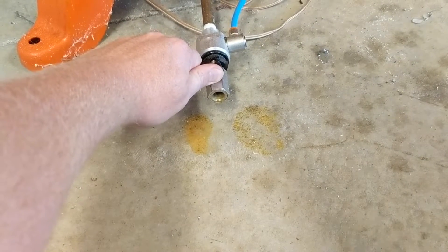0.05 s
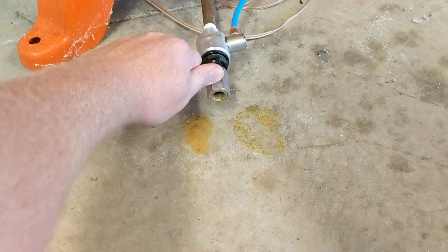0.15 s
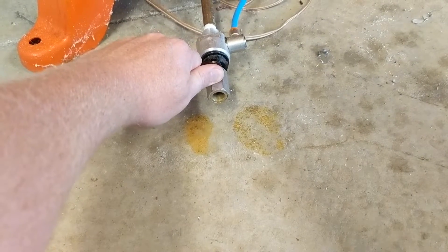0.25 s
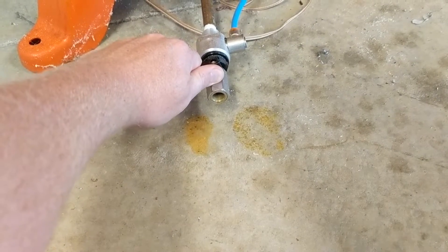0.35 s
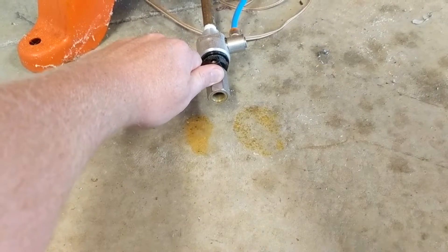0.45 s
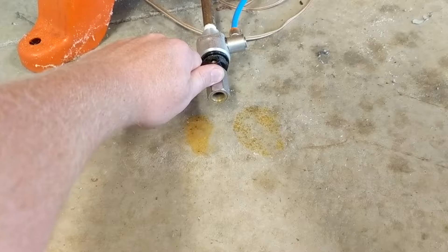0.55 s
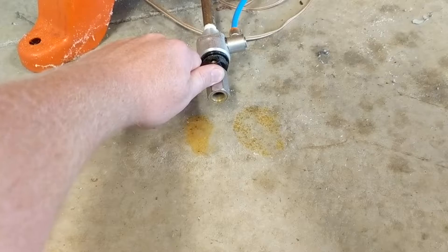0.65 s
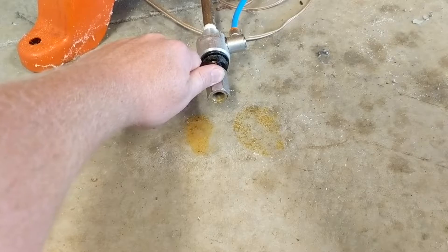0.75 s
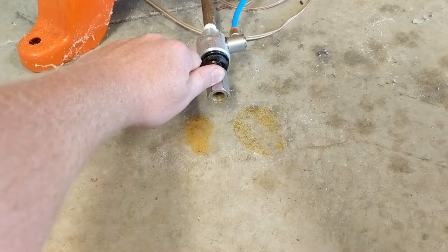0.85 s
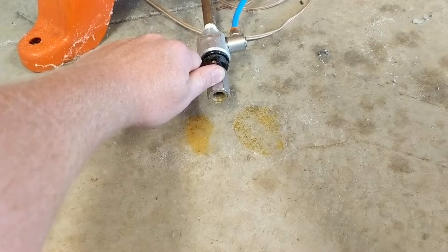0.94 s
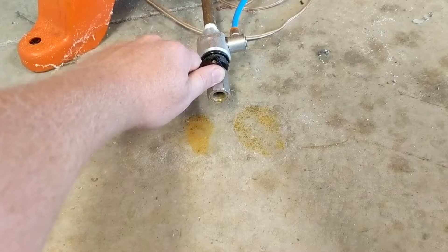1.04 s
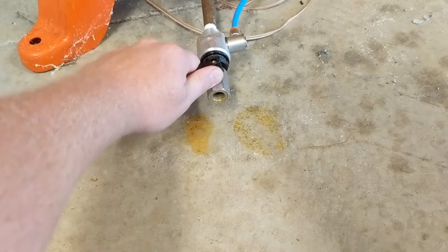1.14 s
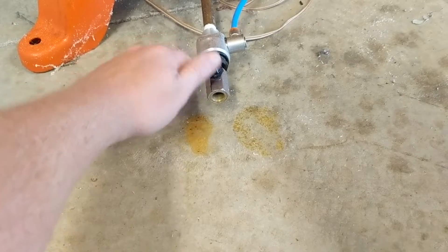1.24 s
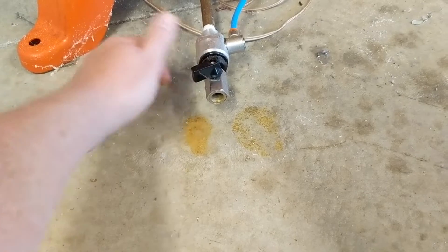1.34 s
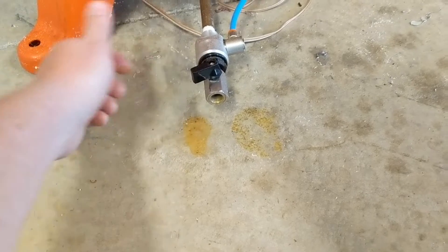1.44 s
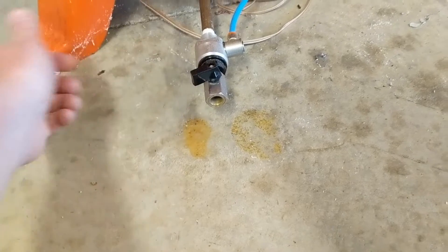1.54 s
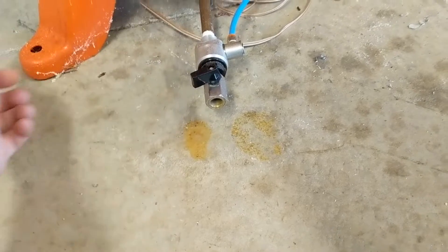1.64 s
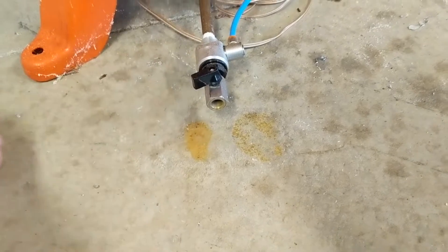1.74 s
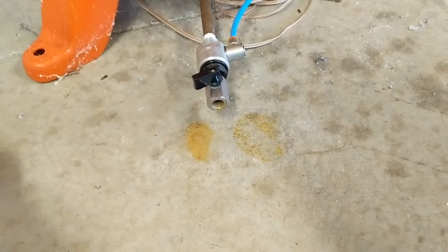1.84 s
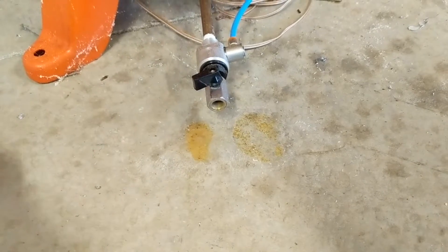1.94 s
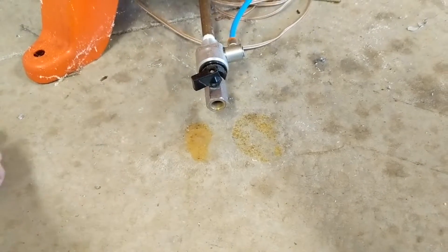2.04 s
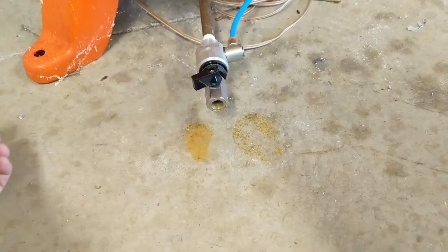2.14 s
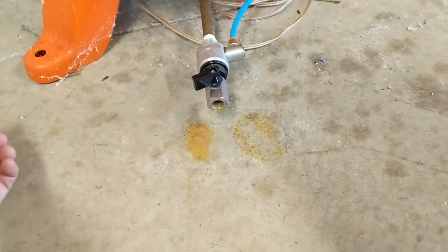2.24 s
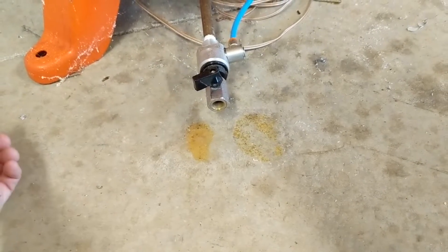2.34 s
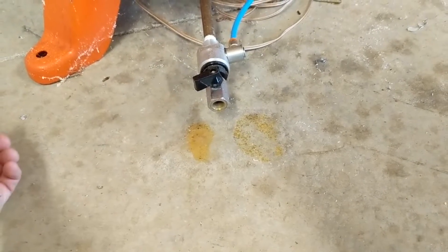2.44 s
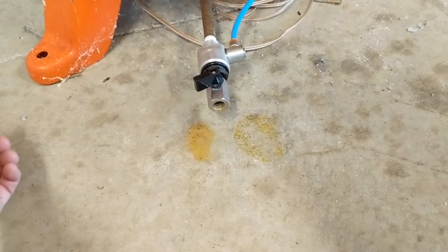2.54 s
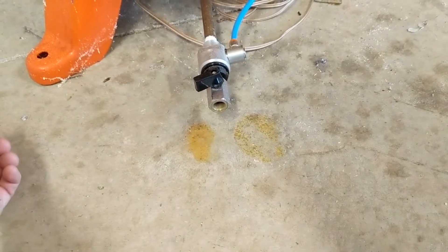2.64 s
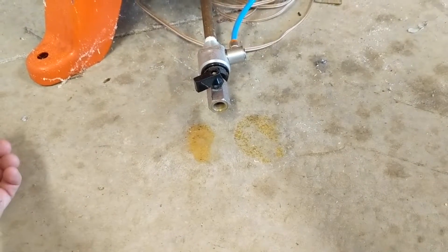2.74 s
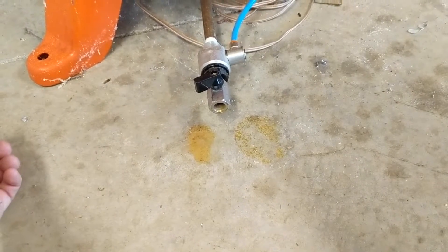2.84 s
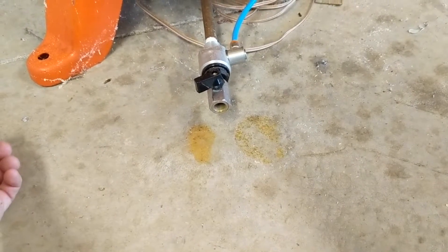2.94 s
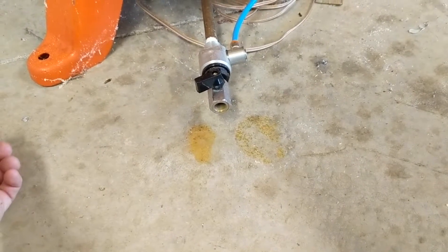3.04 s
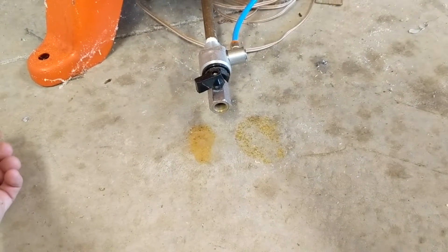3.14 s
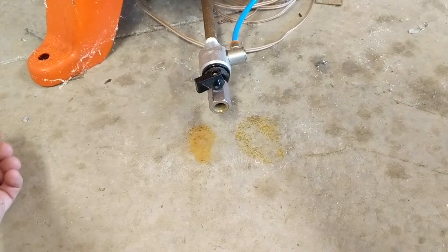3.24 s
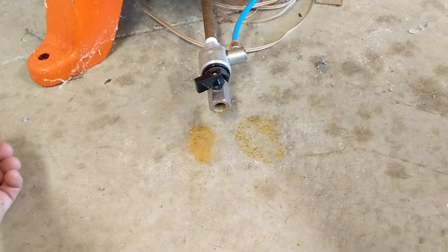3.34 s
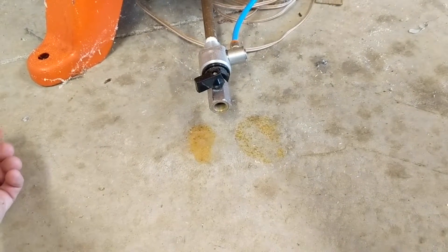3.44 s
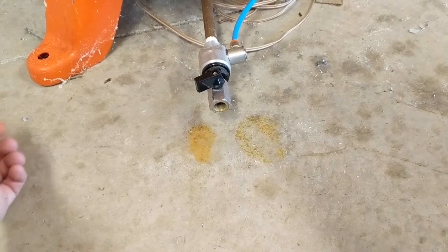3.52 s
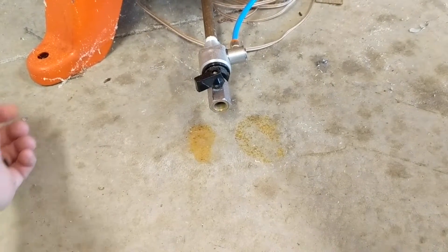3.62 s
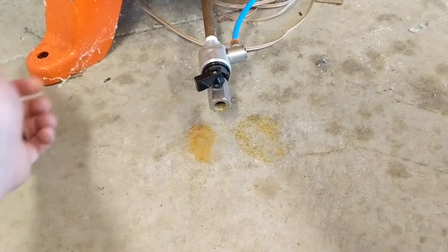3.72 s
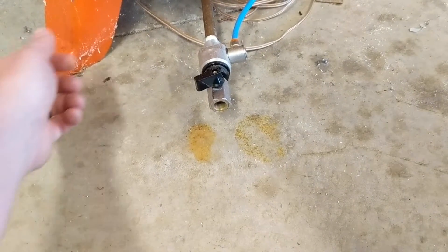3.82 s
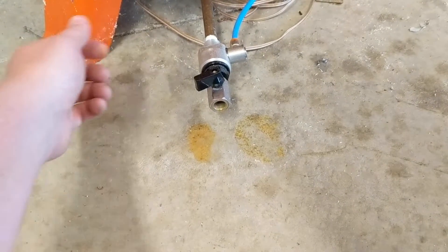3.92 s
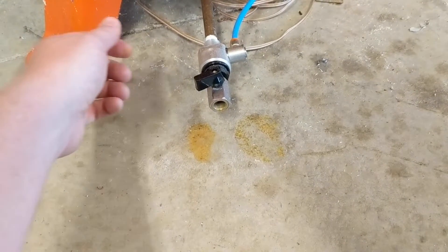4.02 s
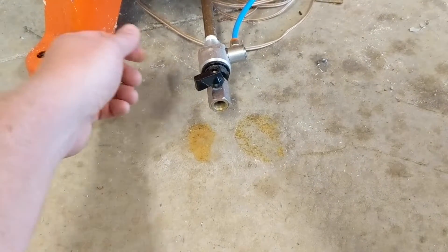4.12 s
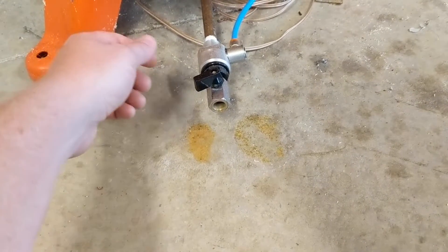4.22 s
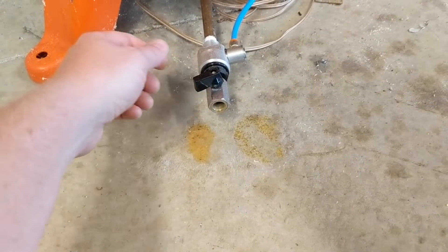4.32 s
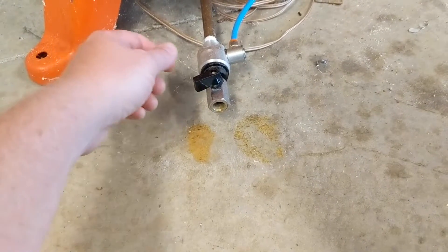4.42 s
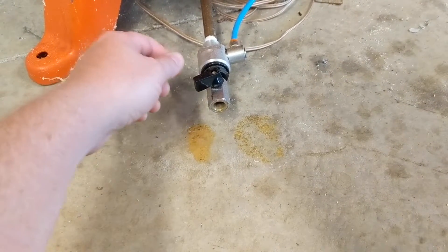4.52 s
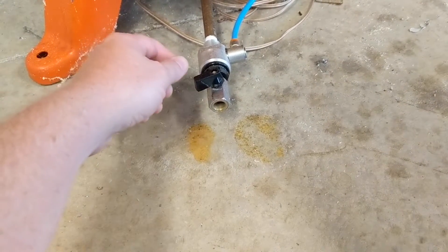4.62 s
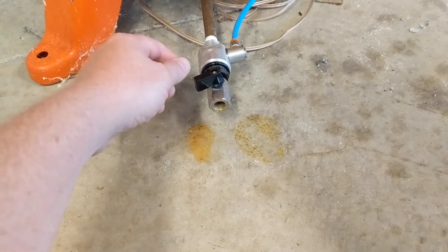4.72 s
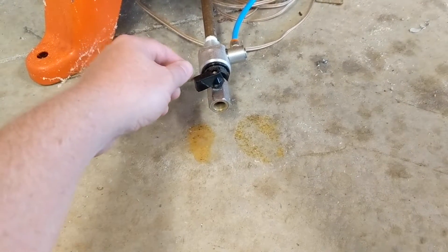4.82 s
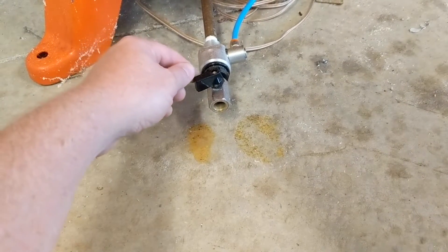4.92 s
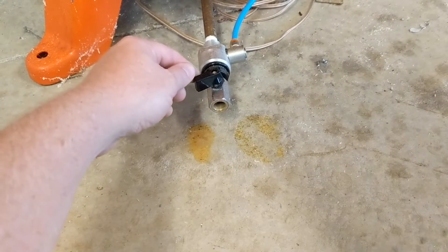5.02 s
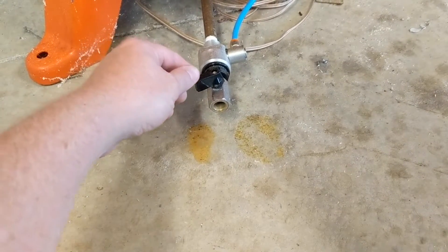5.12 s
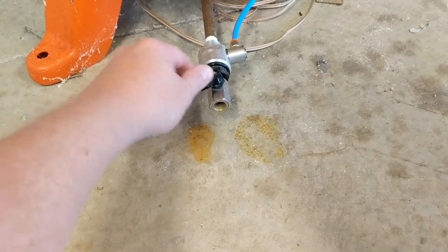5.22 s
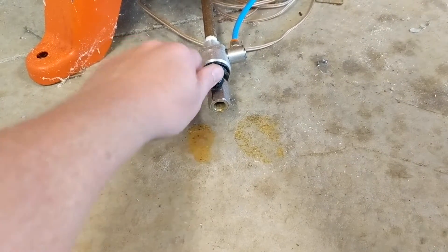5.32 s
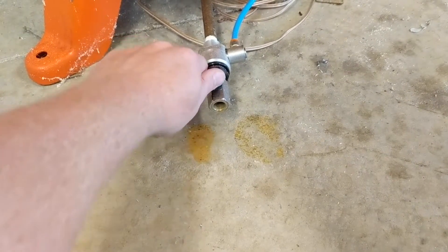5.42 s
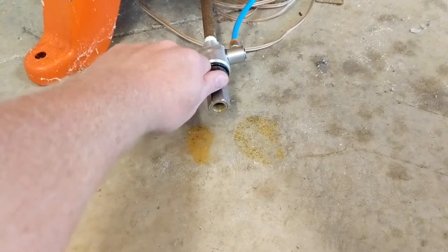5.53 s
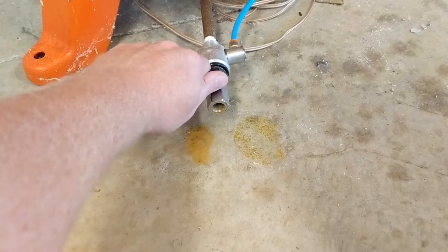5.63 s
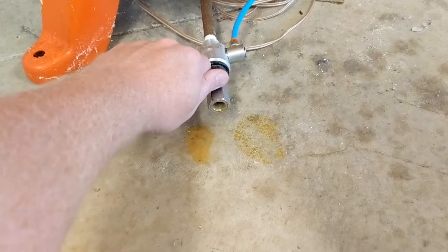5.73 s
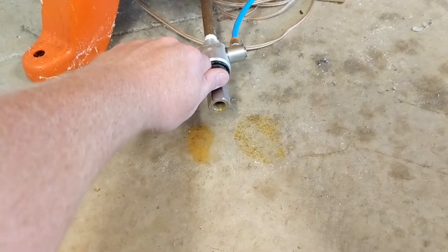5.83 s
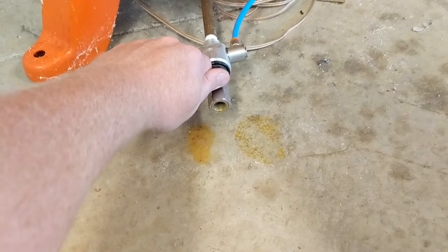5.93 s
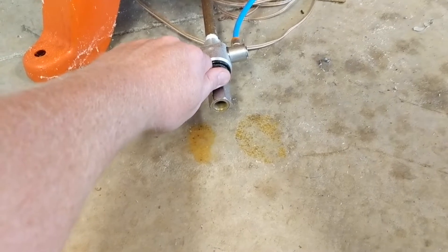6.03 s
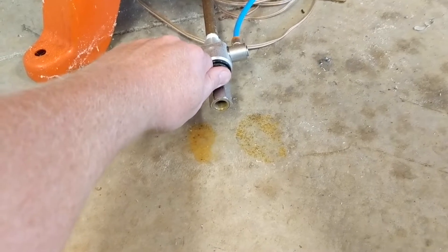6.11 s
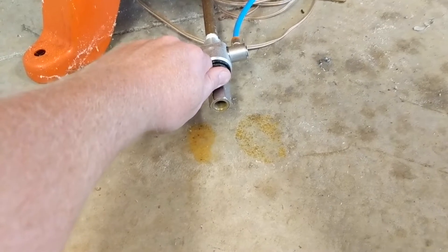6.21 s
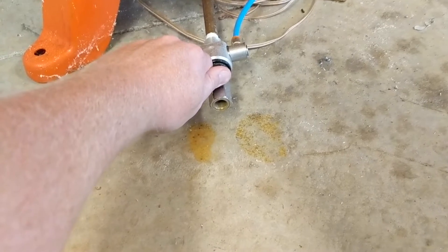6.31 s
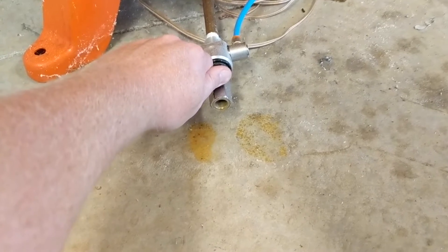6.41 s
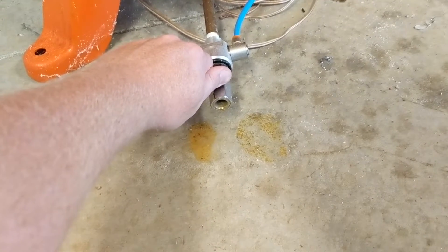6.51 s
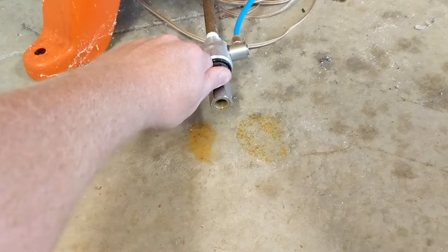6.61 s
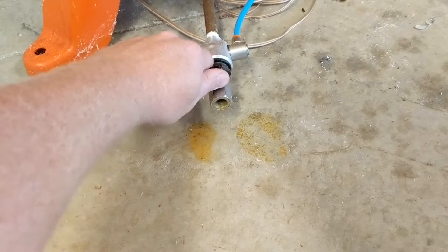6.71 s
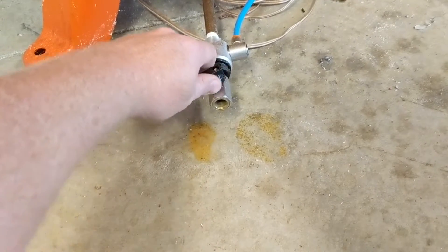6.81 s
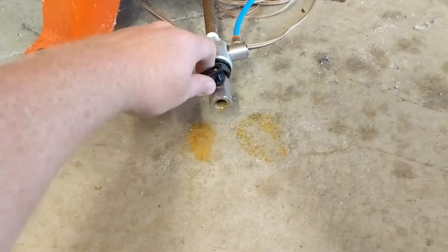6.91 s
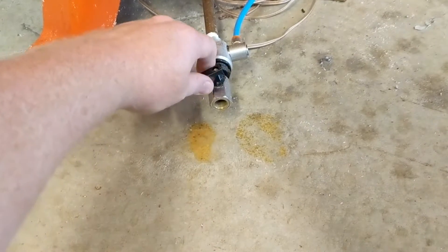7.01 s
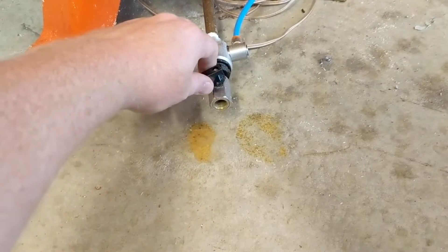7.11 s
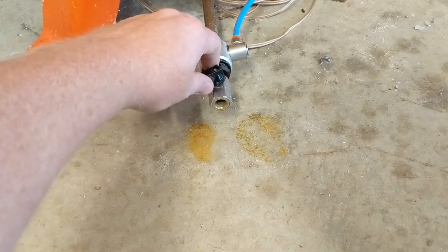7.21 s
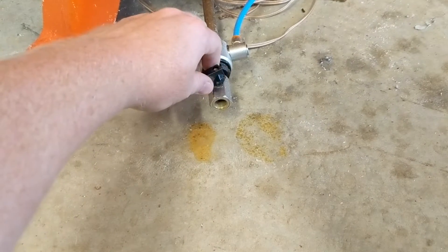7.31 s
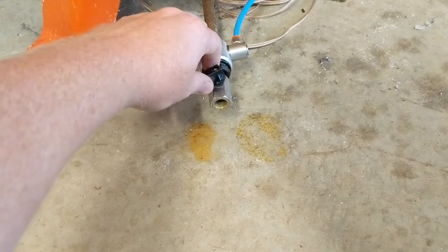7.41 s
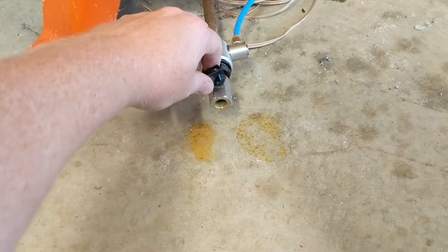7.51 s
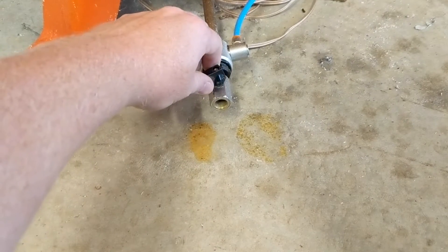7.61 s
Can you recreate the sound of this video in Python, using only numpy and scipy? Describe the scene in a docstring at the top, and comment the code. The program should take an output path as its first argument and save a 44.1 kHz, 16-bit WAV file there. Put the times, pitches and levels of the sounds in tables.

```python
"""A faint mains hum and a quiet room come first; then a hand opens a drain valve just above a concrete floor.
Compressed air hisses out: noise that echoes of floor, fittings and hand comb within milliseconds.
The hand draws back at 1.3 s and returns at 3.7 s, so an echo slides and the comb glides through the hiss.
At 6.1 s it opens the tap further: the hiss grows, and stray air, there as a low roar since the opening, swells.
Pressure steps pop on the microphone at the opening and, thickest, in the last second and a half."""
import sys
import numpy as np
from scipy import signal
from scipy.fft import rfft, irfft, next_fast_len
from scipy.io import wavfile
from scipy.ndimage import uniform_filter1d, map_coordinates

SR = 44100
rng = np.random.default_rng(int(sys.argv[2]) if len(sys.argv) > 2 else 0)


def nominal_scale(level):
    """Amplitude ratio for a level in decibels (scalar or array-like)."""
    x = np.asarray(level, float) / 20
    return 10 ** x


def to_wav(sig):
    """Store sig (one row per channel, or 1-D mono) as 16-bit WAV at the path in sys.argv[1].

    Samples outside -1..1 are clipped; the rate is SR.
    """
    pcm = np.clip(np.atleast_2d(sig), -1, 1) * 32767
    pcm = np.round(pcm).astype(np.int16)
    wavfile.write(sys.argv[1], SR, pcm.T)  # frames by channels


N = 337760  # length in samples
T = np.arange(N) / SR  # time of each sample, s
SIZE = next_fast_len(N + SR // 2)  # spectrum length, with spare room for echoes
HZ = np.arange(SIZE // 2 + 1) * SR / SIZE  # frequency of each spectrum line


def jet():
    """Turbulent noise, surging with its eddies, combed by the echoes of each hand position in turn."""
    # the hiss over time: start_s, body_db (under 4.8 kHz), then levels above the body:
    # edge_db (to about 6 kHz), sizzle_db (to about 10 kHz), top_db (beyond)
    jet_levels = [(0.0, -86, -3, -1, -8), (0.06, -59.5, -4, -3, -17), (0.14, -55, -2, 1.5, -4),
                  (0.32, -30, -7.5, -13, -24), (0.4, -29, -4, -10, -24), (0.59, -28, -4, -10.5, -26),
                  (0.63, -31.5, -4.5, -8, -21), (0.87, -30, -4, -10.5, -23), (0.93, -32, -4, -9.5, -21),
                  (1.4, -29.5, -5, -10, -20), (1.53, -34, -4, -5.5, -13), (1.62, -33, 0.5, -4, -16),
                  (1.81, -29.5, -3.5, -10.5, -19.5), (2.7, -33, -2, -9, -18), (3.62, -32, -2.5, -9.5, -18),
                  (3.73, -30, 1.5, -4.5, -15), (3.84, -32.5, -4, -6.5, -17), (3.92, -33, 3.5, -2, -15),
                  (3.97, -34, -1, -3, -18), (4.09, -34.5, -3, -5, -16), (4.14, -29.5, -11.5, -6.5, -15.5),
                  (4.41, -29, -4.5, -11, -17.5), (5.2, -30, -1, -10, -18), (5.5, -31, -0.5, -3.5, -17.5),
                  (5.97, -30, -1, -4.5, -20), (6.02, -35, -2, -3.5, -17), (6.11, -30.5, -1.5, -6, -20),
                  (6.14, -26, 1, -2, -16), (6.4, -27, 0.5, 2, -12.5), (6.74, -28.5, 3.5, 4, -11),
                  (7.0, -28, 3.5, 0, -11.5), (7.66, -27, 1, 0.5, -12.5)]
    # where the bands split: edge_hz, fade_hz
    jet_bands = [(4800, 200), (6150, 400), (9700, 400)]
    # where hand and phone come to rest: start_s, hollow_hz, hollow_depth (0-1), echoes (delay_ms, share)
    hand_places = [(0, 4820, 0.87, [(2.2, .1), (0.21, .19), (0.34, -.14), (.587, -.18), (1.3, -.16)]),
                   (.3, 4770, 0.99, [(1.6, .06), (0.19, -0.22), (0.34, -0.1), (0.52, 0.00017),
                   (1.9, -.06)]), (1.3, 4760, 0.55, [(1.248, -.07), (0.28, 0.075), (0.42, -0.073)]),
                   (1.78, 4860, 0.65, [(0.39, -0.051), (.166, -.17), (0.2, -0.035), (0.3, -0.18),
                   (.833, 0.052)]), (2.2, 4870, 0.65, [(.52, 0.036), (1.06, -0.04), (1.732, 0.094),
                   (.167, -.13), (.261, -.25), (.34, -0.18), (.411, -0.16), (1.203, -0.0047),
                   (1.467, -0.12)]), (3.67, 4770, 0.72, [(.668, -.08), (0.17, 0.12), (0.47, .08),
                   (1.574, 0.071)]), (4.12, 4900, .6, [(.6, -0.082), (.89, .11), (.129, -.35),
                   (.175, -0.09), (.275, .12), (.469, 0.18)]), (4.35, 4830, 0.71, [(1.6, -0.085),
                   (.344, 0.089), (.127, -0.27), (0.19, 0.049), (0.31, -0.16), (0.62, -0.19), (1.2, 0.14)]),
                   (5.35, 4730, .5, [(.122, -0.16), (.201, 0.11), (.372, .11), (.645, -0.15)]),
                   (5.98, 4650, .65, [(.288, 0.13), (.492, -0.14), (1.186, 0.16)]),
                   (6.13, 4680, 0.52, [(.3, .09), (0.38, 0.047), (0.1, .21), (.202, -0.12), (0.44, -0.09)]),
                   (6.45, 4700, 0.51, [(.908, -.06), (1.196, 0.07), (.222, -0.17), (.306, .18), (.368, .26),
                   (.624, -.15)]), (6.85, 4900, .3, [(.379, 0.045), (.168, 0.044), (0.22, -0.091),
                   (.338, 0.2), (0.84, -0.05), (1.35, -0.13), (0.4, -0.072)]),
                   (7.2, 4450, .25, [(.233, -0.12), (.342, 0.16), (.497, -.1), (.857, -0.044),
                   (1.482, .07)])]
    eddy_db, flutter_db = 0.63, 0.32  # fast and slower surges
    flicker_db, flicker_per_s = 0.65, 24  # each band's own unsteadiness
    move_s = 0.04  # time to change from one place to the next

    surge_db = eddy_db * walk(150) + flutter_db * walk(30)
    eddies = rfft(rng.standard_normal(N) * nominal_scale(surge_db), SIZE)
    fixed_path = nozzle() * fittings() * walls()
    arrived = [np.clip((T - place[0]) / move_s + 0.5, 0, 1) for place in hand_places[1:]]
    # how much each place counts at each moment; the weights add up to 1
    held = -np.diff([np.ones(N)] + arrived + [np.zeros(N)], axis=0)
    parts = shares(jet_bands)
    bands = np.zeros((len(parts), N))
    for weight, (_, hollow_hz, depth, taps) in zip(held, hand_places):
        path = fixed_path * cavity(hollow_hz, depth) * echoes(taps)
        bands += weight * np.array([play(eddies, path * part) for part in parts])
    bands *= [nominal_scale(flicker_db * walk(flicker_per_s)) for _ in parts]

    body_db, *upper_db = columns(jet_levels)
    upper = np.sum(nominal_scale(np.array(upper_db)) * bands[1:], axis=0)
    return sweeps(nominal_scale(body_db) * (bands[0] + upper))


def nozzle():
    """Nozzle and microphone port colour the noise: a weak lower flank, narrow gaps and a sharp upper end."""
    # the weak lower flank: pitch_hz, gain_db (only the shape counts)
    flank = [(500, -50), (1200, -37.5), (1800, -16.5), (2300, -27.5)]
    # nozzle and microphone port above it: pitch_hz, gain_db (only the shape counts)
    port = [(2800, -23.5), (3300, -8), (3900, -3), (4500, -0.5), (5300, 3), (6200, -12), (8000, -11.5),
            (9200, -11), (9900, -23.5), (11000, -25), (12400, -28), (15000, -26.5), (15700, -25)]
    # narrow gaps in the treble: pitch_hz, half_width_hz, depth (0-1)
    gaps = [(12400, 120, .5), (13780, 90, .6)]
    top_hz = 15760  # nothing above this
    gain = colour(list(flank) + list(port)) * (HZ < top_hz)
    return gain * np.prod([dip(*gap) for gap in gaps], axis=0)


def fittings():
    """Hard surfaces close by send back copies of the hiss within about 3 ms."""
    # echoes off floor, valve body and pipes: delay_ms, share (of the direct sound; minus flips it)
    near_echoes = [(0.514, -0.1), (0.567, -0.18), (0.624, -0.1), (0.773, 0.04), (0.839, 0.13),
                   (0.891, 0.06), (1.034, 0.04), (1.156, 0.05), (1.307, -0.03), (1.497, 0.03),
                   (1.919, 0.04), (3.041, -0.03)]
    return echoes(near_echoes)


def walls():
    """Direct sound plus the garage's scattered, fading answer."""
    answer_db, fade_60db_s = -15, 0.07  # whole answer against the direct sound; time to fall by 60 dB
    t = np.arange(SR // 2) / SR
    fade = np.exp(-np.log(1000) * t / fade_60db_s)
    tail = rng.standard_normal(len(t)) * fade * (t > 0.004)  # the first 4 ms stay empty
    return 1 + nominal_scale(answer_db) * rfft(tail / np.sqrt(np.sum(tail ** 2)), SIZE)


def cavity(hollow_hz, depth):
    """A side cavity of the valve swallows one narrow band and rings just under it."""
    hollow = dip(hollow_hz, 130, depth)
    ring = dip(hollow_hz - 300, 91, -0.48 * depth)  # 300 Hz lower, lifted
    return hollow * ring


def sweeps(hiss):
    """The moving hand adds an echo whose delay slides, so the comb glides."""
    # sweeps past the valve: start_s, length_s, first_delay_ms, last_delay_ms, share (at mid-sweep)
    hand_sweeps = [(1.302, 0.54, 0.36, 1.67, 0.25), (3.65, 0.51, 1.57, 0.28, 0.26)]
    out = hiss
    for start_s, length_s, first_ms, last_ms, share in hand_sweeps:
        late_s = np.interp(T, [start_s, start_s + length_s], [first_ms, last_ms]) / 1000
        echo = map_coordinates(hiss, [(T - late_s) * SR], mode="mirror")
        out = out + share * bump(start_s, length_s) * echo
    return out


def draught():
    """Spent air sweeps over the microphone port as noise, in gusts and small lumps."""
    # stray air over time: start_s, low_roar_db, then levels above the low roar:
    # upper_roar_db (over about 1 kHz), buffeting_db (under about 135 Hz)
    air_levels = [(0.0, -81, -8, 2), (0.12, -81.5, -2, 6), (0.32, -68, 13, -8), (0.45, -60, -3, -14),
                  (0.7, -56, 4, -16), (1.05, -59.5, 4.5, -13), (1.5, -55, 8.5, -10), (1.9, -56, 4.5, -13),
                  (3.6, -55.5, 3, -17), (4.0, -55.5, 3.5, -8), (4.4, -55.5, 4.5, -14.5),
                  (5.67, -57.5, 2.5, -19), (6.1, -55.5, 3.5, -8), (6.14, -44.5, -1, -13),
                  (6.25, -36.5, 2, -13), (6.4, -37, 2, -7.5), (6.62, -37, 1, -6), (6.75, -41, 2, -12),
                  (7.0, -44.5, 2.5, -12), (7.66, -45.5, 1.5, -7)]
    # colour of the roar: pitch_hz, gain_db (only the shape counts)
    roar_colour = [(18, -41), (30, -1), (80, 3), (171, -3), (436, -3.5), (490, -2.5), (1890, -0.5),
                   (2740, -0.5), (3200, -6.5), (4160, -59), (7040, -120)]
    # single gusts (+) and lulls (-), on the roar only: middle_s, length_s, level_db (at the middle)
    single_gusts = [(0.397, .04, 6), (1.563, 0.041, 3), (1.6, .04, 0), (3.708, 0.068, -13), (4.09, 0.06, 5),
                    (4.135, 0.069, 7.5), (4.187, 0.055, 7.5), (6.423, .04, -4), (6.594, 0.058, -4),
                    (6.672, 0.06, 3.5), (6.971, 0.099, 5.5), (7.04, 0.025, 4.5), (7.28, 0.084, 6.5),
                    (7.476, 0.029, 6.5), (7.532, 0.13, 6.5)]
    gust_db, lump_db, sway_db = 0.4, 1.0, 2.0  # slow gusts, small lumps, sway of the buffeting

    air = rfft(rng.standard_normal(N) * nominal_scale(gust_db * walk(25) + lump_db * walk(220)), SIZE)
    gain = colour(roar_colour)
    buffet, low, upper = (play(air, gain * part) for part in shares([(135, 113), (1050, 540)]))
    low_db, upper_db, buffet_db = columns(air_levels)
    gusts_db = sum(db * bump(middle_s - length_s / 2, length_s) for middle_s, length_s, db in single_gusts)
    roar = nominal_scale(gusts_db) * (low + nominal_scale(upper_db) * upper)
    buffeting = nominal_scale(buffet_db + sway_db * walk(4.4)) * buffet
    return nominal_scale(low_db) * (roar + buffeting)


def pops():
    """Each puff is a sudden pressure step on the microphone that leaks away."""
    # puffs: start_s, level_db (of the step, ahead of the low cut), direction (+1 push, -1 pull)
    puffs = [(.3546, -28.5, -1), (0.4042, -36, 1), (0.538, -48, 1), (.7366, -59, -1), (2.8404, -49, 1),
             (3.4005, -48, 1), (3.9117, -38, 1), (3.95, -34, -1), (6.1432, -25, 1), (6.6729, -24, -1),
             (6.8605, -28, 1), (6.9872, -27, 1), (7.0405, -32, 1), (7.2548, -26, -1), (7.282, -28, 1),
             (7.474, -30, 1), (7.525, -27, 1)]
    rise_ms, leak_ms = 0.16, 30
    t_ms = np.arange(SR // 4) / SR * 1000
    step = (1 - np.exp(-t_ms / rise_ms)) ** 2 * np.exp(-t_ms / leak_ms)
    out = np.zeros(N + SR)  # spare room for the last puff
    for start_s, db, direction in puffs:
        first = int(start_s * SR)
        out[first:first + len(step)] += np.sign(direction) * nominal_scale(db) * step
    return out[:N]


def mains_hum():
    """Steady low tones that waver a little in level and sink once the hiss is up."""
    # tones: pitch_hz, level_db (rms, ahead of the wavering and sinking)
    tones = [(59.2, -69), (118.4, -76)]
    # how far the hum sinks: start_s, change_db
    sinking = [(0, 0), (.35, -2), (.6, -7), (7.66, -6)]
    hum = np.zeros(N)
    for hz, db in tones:
        tone = np.sin(2 * np.pi * (hz * T + rng.random()))
        hum += np.sqrt(2) * nominal_scale(db + 1.6 * walk(12)) * tone
    return hum * nominal_scale(columns(sinking)[0])


def quiet_room():
    """The quiet of the room: faint steady noise, strongest in the bass."""
    # colour of the quiet: pitch_hz, gain_db (only the shape counts)
    quiet_colour = [(24, -30), (40, 0), (98, -8), (156, -15), (2390, -39), (4450, -25), (4790, -21),
                    (15000, -41)]
    return nominal_scale(-81) * play(rfft(rng.standard_normal(N), SIZE), colour(quiet_colour))


def colour(points):
    """Gain at every frequency, drawn through (Hz, dB) points."""
    hz, db = np.transpose(points)
    return nominal_scale(np.interp(np.log(HZ + 1), np.log(hz), db))


def shares(edges):
    """Overlapping bands that add up to the whole, split at (Hz, fade Hz) edges."""
    above = [np.clip((HZ - hz) / fade_hz + 0.5, 0, 1) for hz, fade_hz in edges]
    return -np.diff([np.ones(len(HZ))] + above + [np.zeros(len(HZ))], axis=0)


def play(spectrum, gain):
    """Sends a noise spectrum through a gain curve and evens out the power the curve adds or takes."""
    return irfft(spectrum * gain, SIZE)[:N] / np.sqrt(np.mean(np.abs(gain) ** 2))


def echoes(taps):
    """Direct sound plus delayed copies, which strengthen some pitches and cancel others: a comb."""
    return 1 + sum(share * np.exp(-2j * np.pi * HZ * ms / 1000) for ms, share in taps)


def dip(hz, half_width_hz, depth):
    """A resonance that swallows (depth > 0) or lifts (depth < 0) a narrow band."""
    return 1 - np.minimum(depth, 1) / (1 + 1j * (HZ - hz) / half_width_hz)


def walk(per_s):
    """Random levels, per_s of them each second, smoothed twice; spread 1."""
    hold = max(int(SR / per_s), 2)
    levels = np.repeat(rng.standard_normal(N // hold + 1), hold)
    smooth = uniform_filter1d(uniform_filter1d(levels, hold), hold)[:N]
    return smooth / smooth.std()


def columns(table):
    """Draws each column of a table as a curve over time; the first column is the time in s."""
    s, *values = np.transpose(table)
    return [np.interp(T, s, v) for v in values]


def bump(start_s, length_s):
    """A smooth rise from 0 to 1 and back."""
    return np.sin(np.pi * np.clip((T - start_s) / length_s, 0, 1)) ** 2


def scene():
    """One microphone feeds both channels."""
    mix = jet() + draught() + pops() + mains_hum() + quiet_room()
    return np.tile(mix, (2, 1))


def low_pass(x):
    """Removes everything above the highest recorded frequency."""
    return signal.sosfilt(signal.butter(12, 16990, fs=SR, output="sos"), x)


def record(dry):
    """A steep low cut turns the pressure steps into thuds; then peaks are gently rounded."""
    low_cut_hz, ceiling = 56, 0.71  # ceiling as a share of full scale
    low_cut = signal.butter(4, low_cut_hz, "high", fs=SR, output="sos")
    x = signal.sosfilt(low_cut, dry)
    return low_pass(ceiling * np.tanh(x / ceiling))


dry = scene()
out = record(dry)
to_wav(out)
```